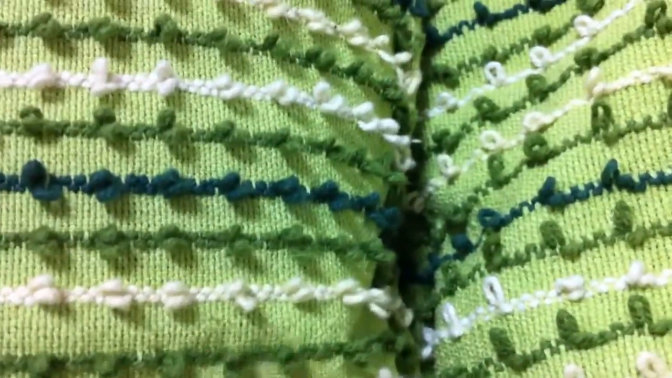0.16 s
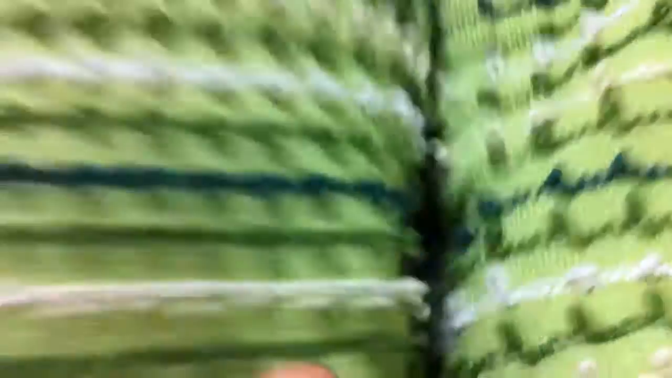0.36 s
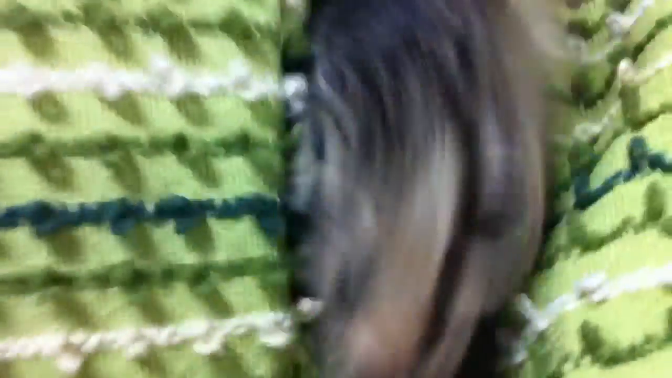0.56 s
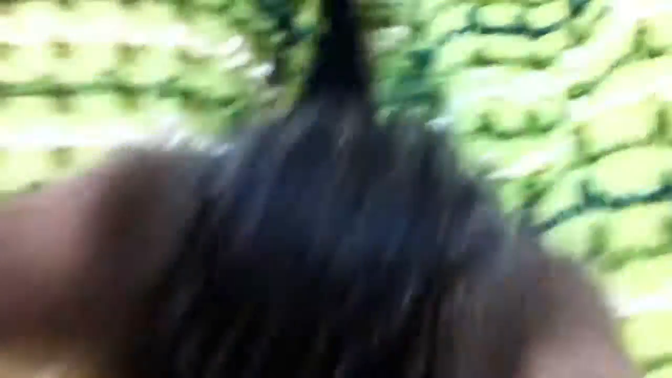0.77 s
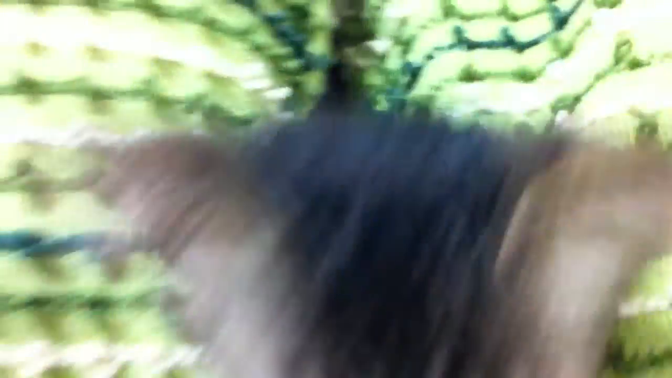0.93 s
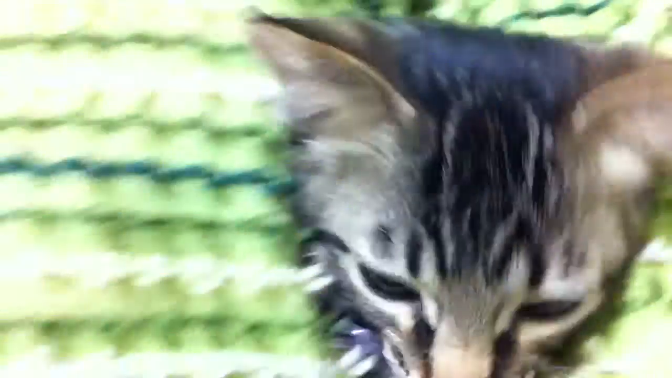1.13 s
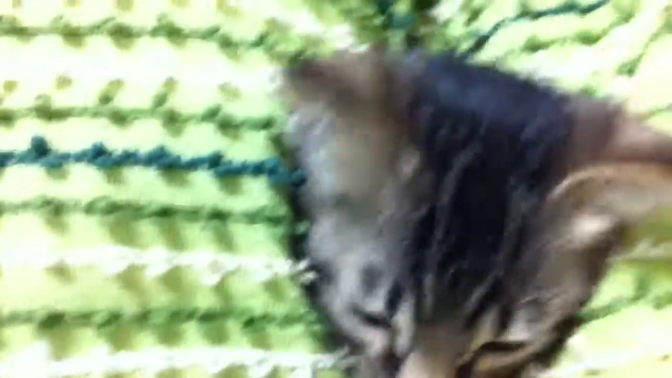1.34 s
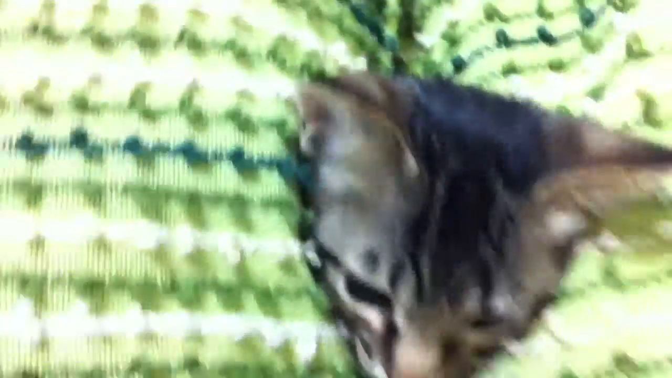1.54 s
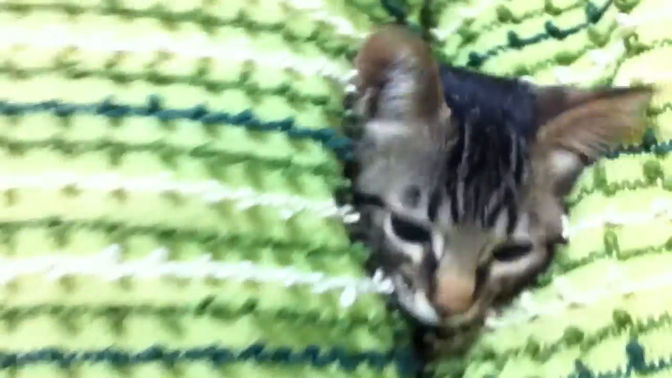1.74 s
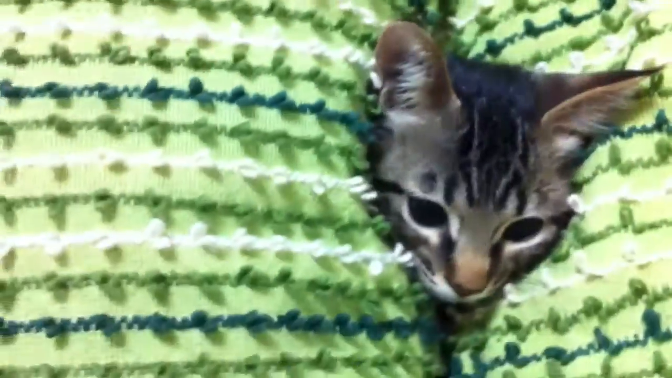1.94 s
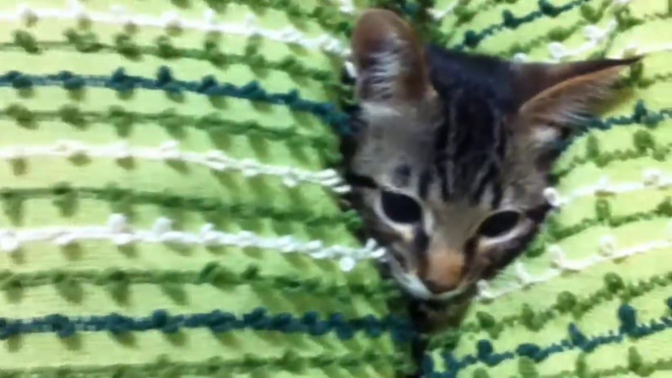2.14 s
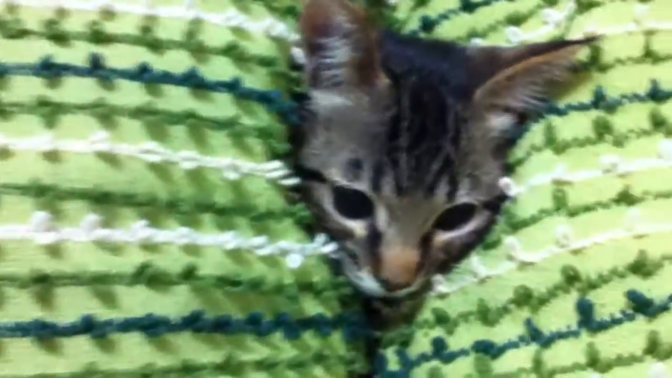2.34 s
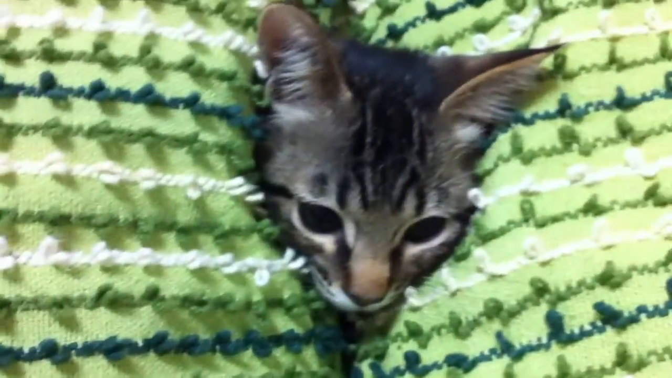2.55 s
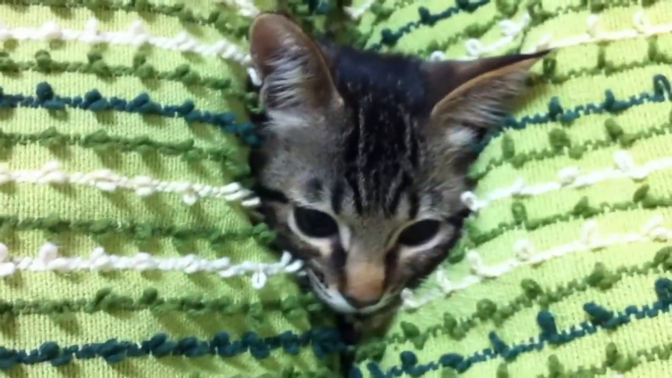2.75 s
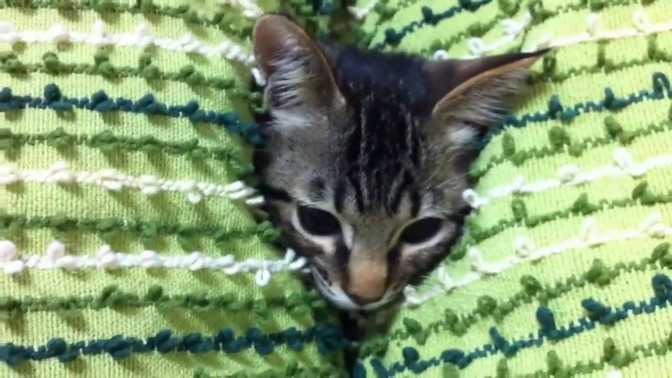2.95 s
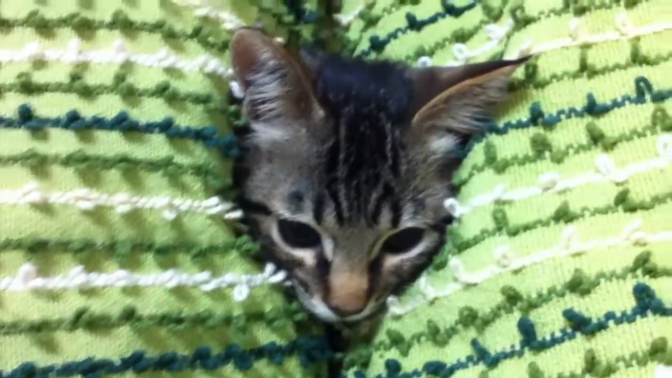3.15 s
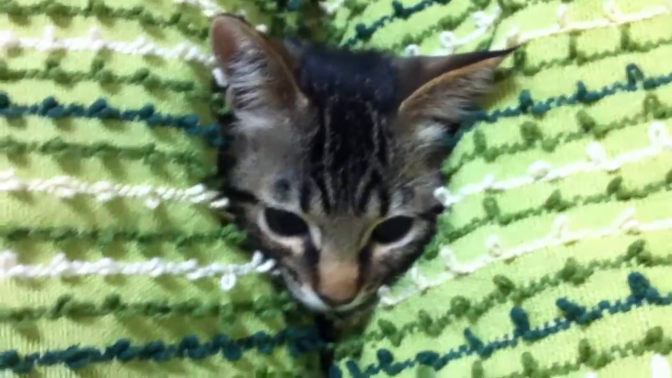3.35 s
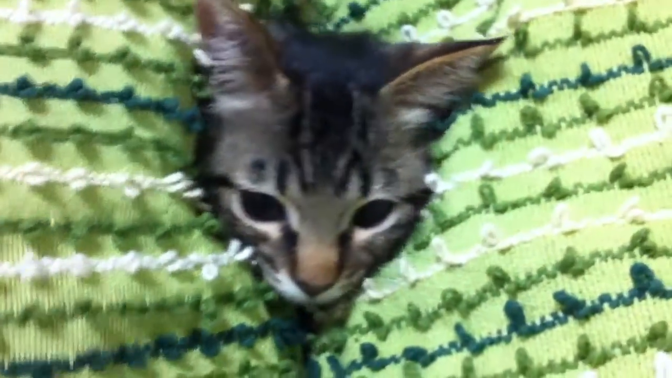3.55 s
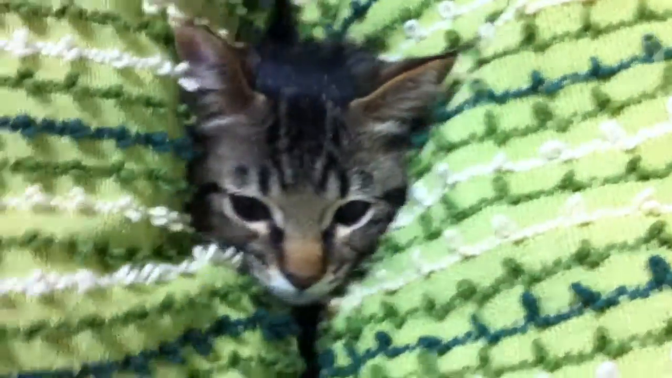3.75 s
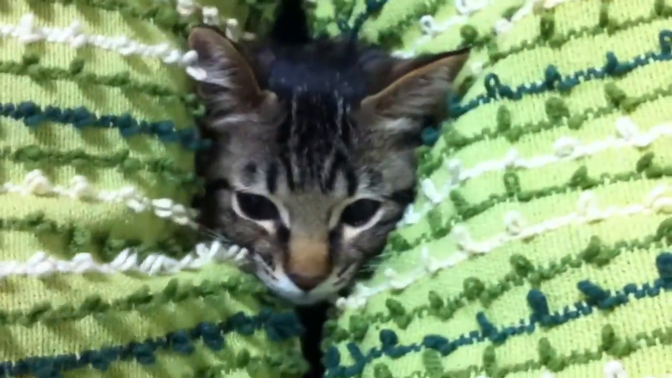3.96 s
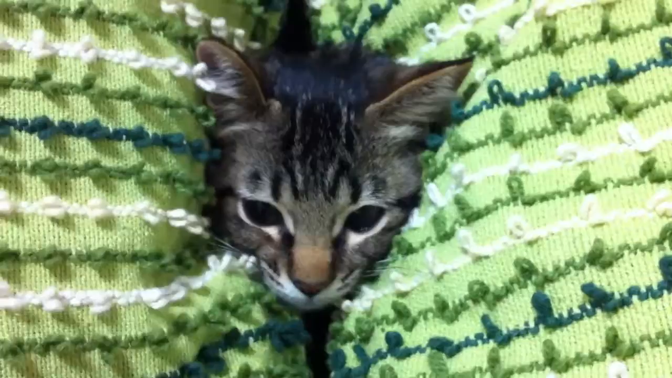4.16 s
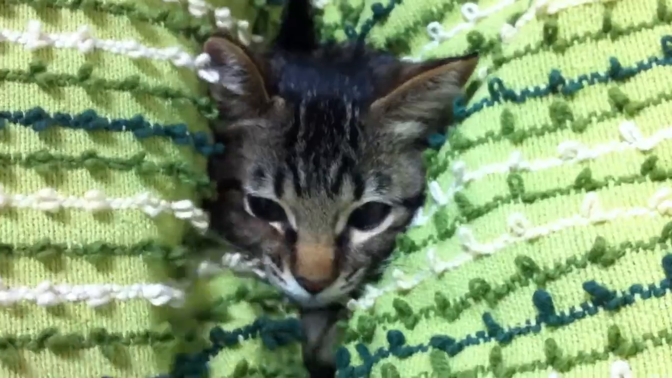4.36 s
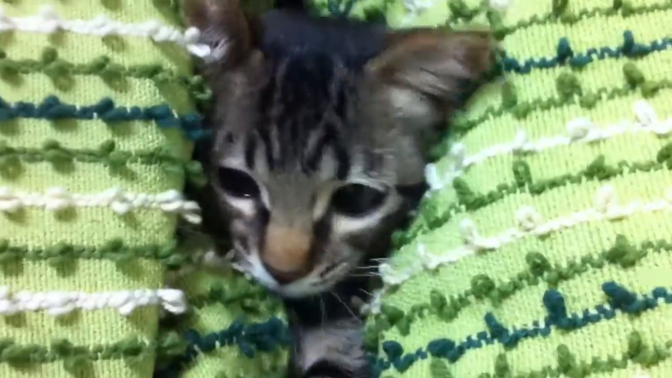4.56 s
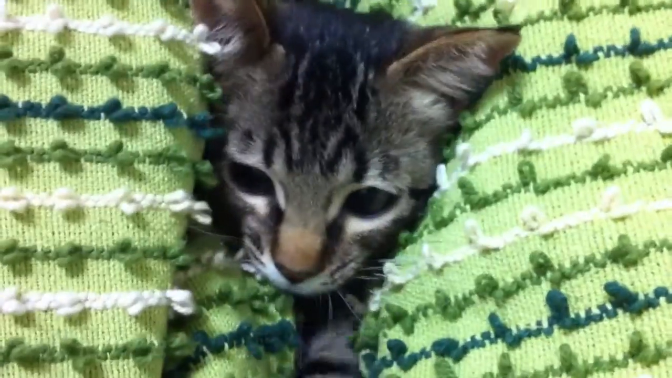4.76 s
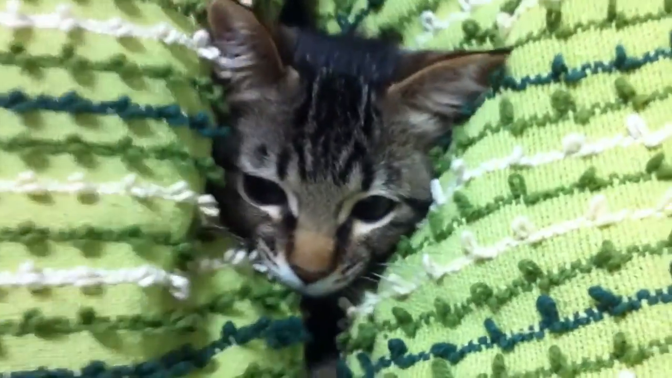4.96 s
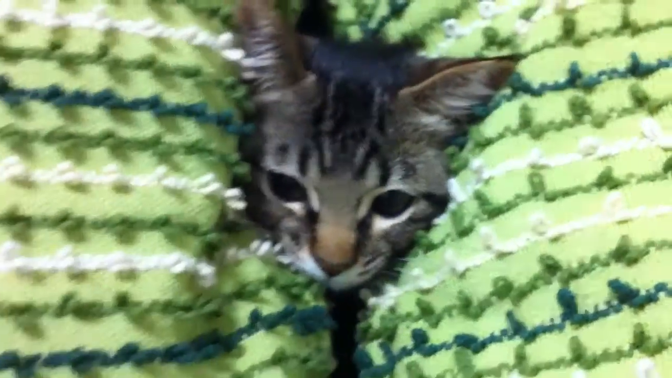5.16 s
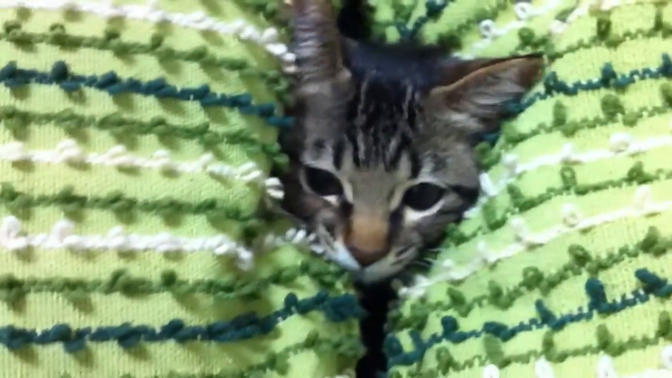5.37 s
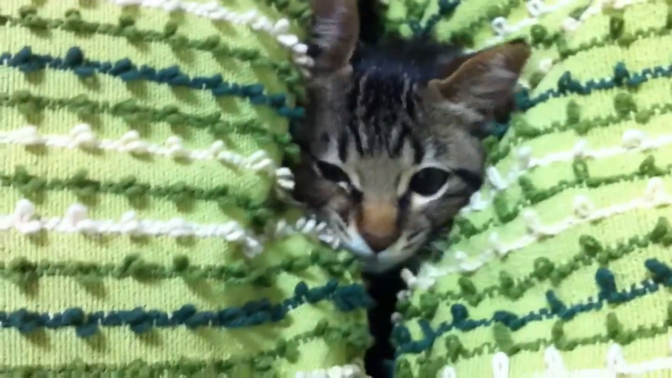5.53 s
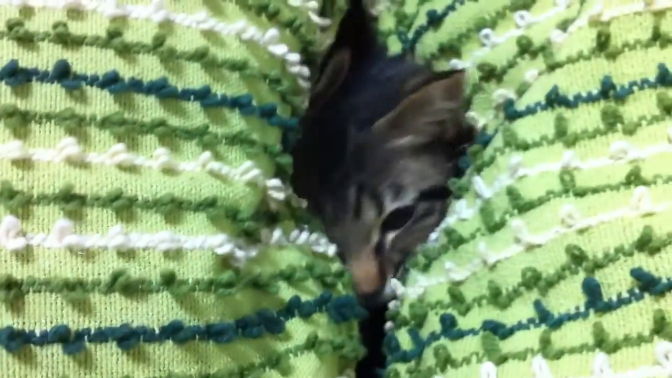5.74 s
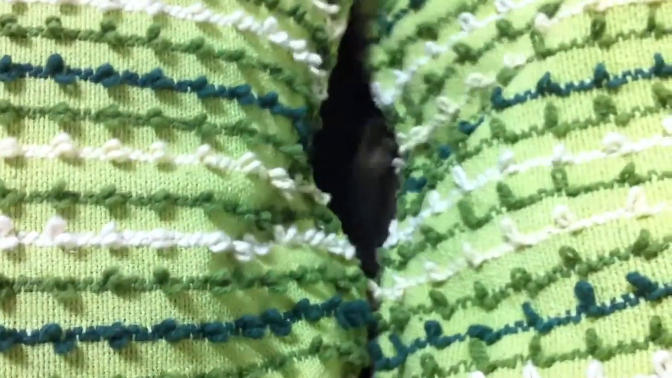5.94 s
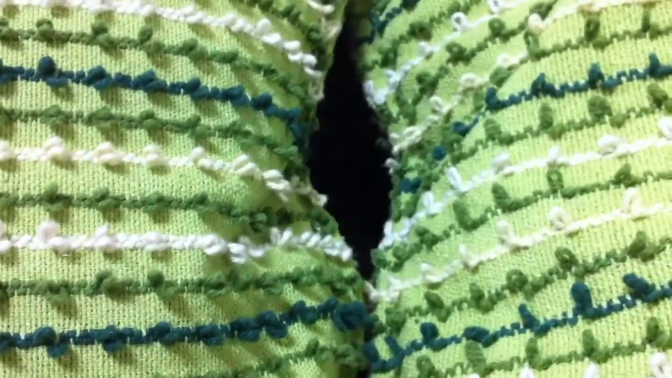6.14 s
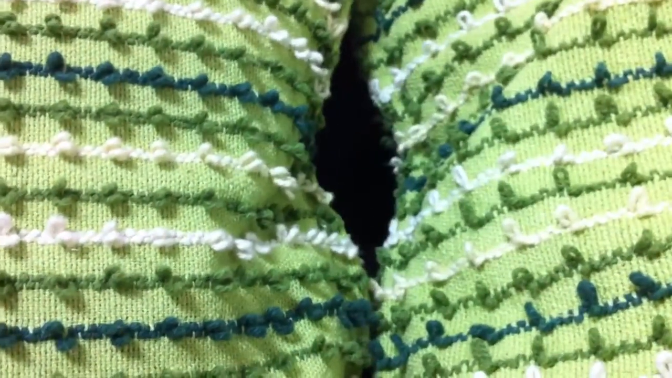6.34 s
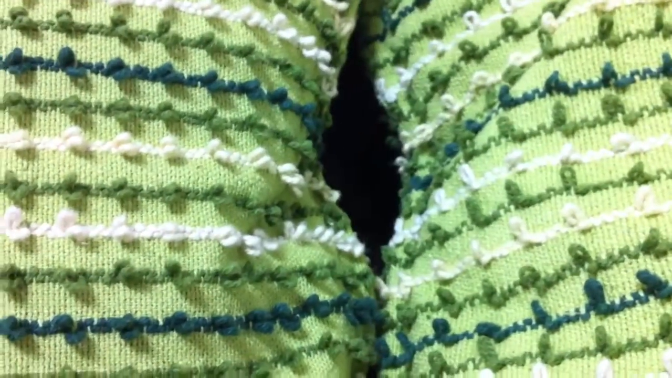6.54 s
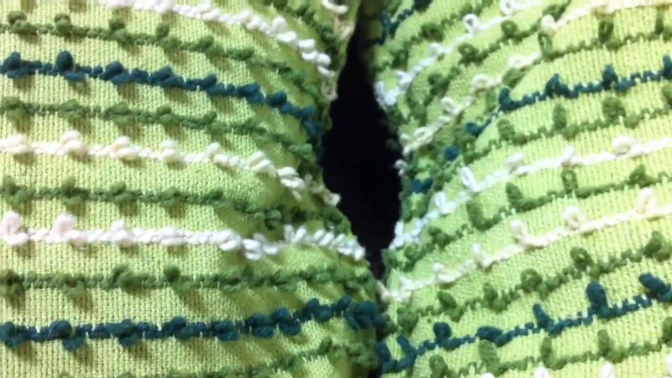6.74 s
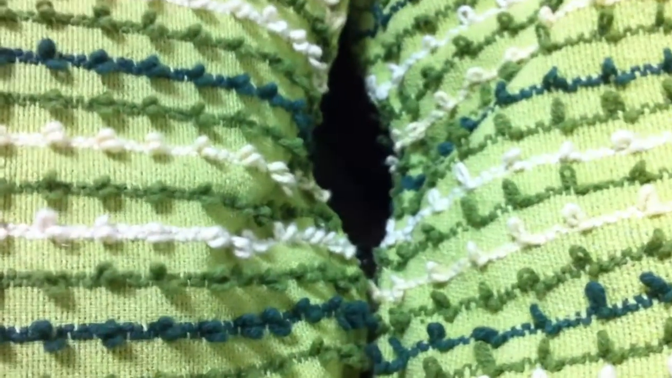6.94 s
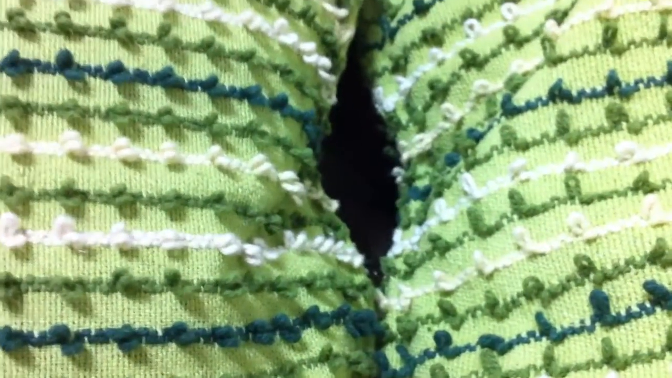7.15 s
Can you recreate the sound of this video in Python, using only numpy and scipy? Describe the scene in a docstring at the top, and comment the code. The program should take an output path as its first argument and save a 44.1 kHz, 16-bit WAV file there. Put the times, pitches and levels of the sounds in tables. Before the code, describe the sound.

Soft knit rustling and smothered little bell jingles in a quiet room, then faint tinkles, small bumps, and one loud handling clunk near the end.

```python
"""A small bell, likely on a kitten's collar, jingles close by, half smothered by fur and wool: a pellet
strikes and rolls in a shell of damped modes. The kitten pokes out of a knitted blanket and ducks back in.
The knit rustles, as swells of rub and fine hiss made from slipping fibres. Contact pulses and friction noise
make the bumps, dry ticks and one late scrape of cloth on the hand-held camera and its microphone.
The place is a quiet room: low hum under shaped noise for air and microphone hiss, and no echo."""
import sys
import numpy as np
from scipy import signal
from scipy.fft import rfft, irfft, next_fast_len
from scipy.io import wavfile
from scipy.ndimage import map_coordinates

SR = 44100
rng = np.random.default_rng(int(sys.argv[2]) if len(sys.argv) > 2 else 0)


def store_wav(level_fs):
    """Save 16-bit WAV to argv[1]."""
    pcm = np.round(np.clip(np.atleast_2d(level_fs), -1, 1) * 32767)
    wavfile.write(sys.argv[1], SR, pcm.T.astype(np.int16))


N = 317556  # length in samples

# Room air and microphone hiss, spectrum: (frequency [Hz], relative density [dB per Hz])
ROOM_SPECTRUM = [(15, -30), (25, -32), (48, -34.5), (91, -14), (104, -14), (123, -2), (157, -7.5),
                 (205, -6), (307, -4), (382, -11), (425, -10.5), (461, -13.5), (857, -14.5), (1550, -21.5),
                 (15800, -27.5)]
# Hum of a distant appliance: (frequency [Hz], mean level [dB])
HUM_TONES = [(120, -79), (298, -81)]
# Fur and wool sliding over each other: (peak time [s], half length [s], rub level [dB], fine hiss level [dB])
BLANKET_STROKES = [(0.132, 0.19, -68, -69.5), (0.542, 0.066, -59, -63.5), (0.737, 0.081, -57.5, -59),
                   (1.156, .06, -68.5, -60), (1.45, 0.047, -78, -61), (1.743, 0.21, -65, -65),
                   (3.804, 0.104, -64, -66.5), (4.244, 0.096, -67.5, -70.5), (4.553, .073, -65.5, -70),
                   (5.039, 0.026, -63.5, -58.5), (5.965, 0.057, -67, -73)]
# Dull rub of the knit, spectrum: (frequency [Hz], relative density [dB per Hz])
KNIT_SPECTRUM = [(60, -32), (130, 0.5), (280, -3), (600, -7.5), (1200, -10.5), (2400, -13), (4000, -15.5),
                 (8000, -23.5), (15000, -84)]
# Hiss of fine fibres, spectrum: (frequency [Hz], relative density [dB per Hz])
FIBRE_SPECTRUM = [(800, 3), (2500, -2.5), (5000, 0), (9000, 0), (10500, -7.5), (13000, -1), (16000, -6)]
# Bumps on the camera body: (time [s], peak level [dB], contact sharpness [Hz])
CAMERA_BUMPS = [(0.437, -40, 232), (0.5247, -42, 1800), (0.552, -36, 1310), (0.5861, -42.5, 290),
                (0.6957, -42.5, 1500), (0.7317, -36, 1800), (3.644, -49, 447), (3.7423, -41, 308),
                (3.7846, -47, 300), (3.8268, -37, 317), (4.1794, -44.5, 220), (4.204, -34, 336),
                (4.224, -34, 200), (4.2449, -40, 520), (4.2473, -34, 745), (4.5832, -35.5, 960),
                (5.0387, -37, 1070), (5.051, -40.5, 970), (5.6925, -21, 2630), (5.696, -14.5, 1540),
                (5.6984, -21.5, 750), (5.6986, -21.5, 235), (5.721, -23, 755), (5.7274, -29, 520),
                (5.7744, -29.5, 214), (5.788, -41, 210), (5.943, -48, 1490), (6.738, -46.5, 1550)]
# Flurries of blanket nudges: (peak time [s], half length [s], level [dB], contact sharpness [Hz])
BLANKET_NUDGES = [(.552, 0.03, -53.5, 1000), (0.744, 0.04, -53, 900), (3.816, 0.02, -54, 550),
                  (4.224, .018, -51, 547)]
# Damped modes of the camera body: (frequency [Hz], relative level [dB], T60 [s])
CASE_MODES = [(179.5, 5.5, 0.0295), (260.8, 2.5, 0.026), (450, -7, 0.013), (753, -9, 0.017),
              (1300, -3.5, 0.0055), (2100, -28, 0.0019)]
# Collar sways that set the pellet rolling: (peak time [s], half length [s], drive level [dB])
COLLAR_SWAYS = [(0.444, 0.022, -73), (0.616, 0.014, -46), (0.676, .016, -64), (0.771, .009, -54),
                (0.878, 0.0095, -42.5), (0.903, .022, -59), (0.968, 0.026, -51), (1.033, 0.029, -57),
                (1.106, 0.015, -57), (1.207, 0.0154, -55.5), (1.895, 0.035, -67), (2.188, .028, -68),
                (2.338, 0.017, -70), (3.975, .018, -62), (4.067, 0.025, -57.5), (4.234, 0.0089, -70.5),
                (4.423, .025, -75), (4.554, 0.013, -62), (4.66, 0.035, -64.5), (4.77, 0.072, -80),
                (5.137, 0.075, -77), (6.104, .02, -68.5)]
# Lower cluster of shell modes: (nominal frequency [Hz], mean relative level [dB], share of ring time [1])
LOW_SHELL_MODES = [(4600, 2.5, 1), (4680, -2.5, 1), (4600, -20, 0.7), (5740, -9, 0.7), (5800, -17, 0.52)]
# Upper cluster of shell modes: (nominal frequency [Hz], mean relative level [dB], share of ring time [1])
HIGH_SHELL_MODES = [(11300, -4.5, 1), (11620, -0.5, 1)]
# Click of pellet on shell, spectrum: (frequency [Hz], relative density [dB per Hz])
CLICK_SPECTRUM = [(1000, -78), (2400, -40.5), (3300, -27.5), (4000, -19.5), (4700, 8), (5100, 6.5),
                  (5600, 4), (6600, -12), (9000, -15.5), (10300, -53), (11500, -24), (15000, -36)]
# How far the wool lets the bell sound: (time [s], ring T60 [s], relative level of the upper part [dB])
BELL_FREEDOM = [(.6, 0.0282, -25), (.76, 0.039, -12.5), (.86, 0.025, -5), (.955, 0.072, -11),
                (1.04, .032, -5), (1.14, 0.028, -8), (1.25, 0.027, -16), (4.0, 0.03, -23.5),
                (4.62, 0.011, -18)]
# Hard pellet strikes on the shell: (time [s], strike strength [dB])
PELLET_STRIKES = [(0.6007, -42), (0.6057, -37.5), (.7072, -42), (0.7433, -34.5), (0.7599, -41), (.771, -41),
                  (0.8384, -27.5), (0.8804, -33.5), (.937, -37.5), (0.95, -36.5), (.9576, -37),
                  (.9736, -45), (.987, -44), (1.1415, -38.5), (1.1724, -52), (1.217, -46), (1.2444, -50.5),
                  (1.2875, -45.5), (1.8811, -47.5), (1.9382, -47.5), (2.1604, -52.5), (2.3165, -48.5),
                  (3.9573, -41.5), (3.984, -51), (4.045, -54), (4.058, -50.5), (4.1334, -56), (4.297, -55),
                  (4.5885, -45.5), (4.6242, -42.5), (4.646, -39.5)]
# Jolt of the whole bell: (nominal frequency [Hz], mean relative level [dB], share of ring time [1])
JOLT_MODES = [(4300, -6, 1), (4200, 8, 1)]
# Tiny dry ticks: (time [s], peak level [dB], centre frequency [Hz])
DRY_TICKS = [(3.456, -42, 5900), (3.8308, -47, 3400), (5.0505, -41, 11500), (5.693, -30.5, 2380),
             (5.6967, -19.5, 2100), (5.699, -43, 13100), (5.729, -45.5, 7500), (6.711, -45, 10000),
             (6.768, -49, 7950), (6.8023, -42, 6740), (6.908, -53.5, 3480), (7.13, -53, 2480)]
# Cloth dragging over the camera: (peak time [s], half length [s], level before the bass cut [dB])
CLOTH_DRAGS = [(5.699, 0.0059, -33), (5.723, .0065, -45.5), (5.759, 0.0135, -50.5), (5.7785, 0.0081, -31.5)]
# Cloth on the camera, spectrum: (frequency [Hz], relative density [dB per Hz])
SCRAPE_SPECTRUM = [(50, -27), (100, -3), (190, 8.5), (350, -13), (600, -15), (1000, -10), (1700, -14.5),
                   (2400, -7), (3100, -22.5), (5000, -20.5), (6500, -28.5), (9000, -33.5), (15500, -42)]

ROOM_DB = -65
REBOUND_S, REBOUND_LOSS_DB = 0.0099, 14.5  # mean spacing of bounces, and mean loss at each
TAP_DB, TAP_GROWS = -35.5, 0.37  # mean tap strength at a 0 dB sway, and dB gained per dB of sway
TOP_HZ = 15850  # the camera's band limit


def amp(db):
    """Decibels to gain."""
    return 10 ** (np.asarray(db) / 20)


def unit(x):
    """Scale to rms 1."""
    return x / np.sqrt(np.mean(x ** 2) + 1e-20)


def seconds(size):
    """A time axis [s]."""
    return np.arange(size) / SR


def fade(t, t60):
    """Exponential decay, down 60 dB after t60 seconds."""
    return np.exp(-np.log(1000) * t / t60)


def filtered(x, response):
    """Apply a complex response, given as a function of frequency."""
    size = next_fast_len(len(x) + SR // 4)
    hz = np.fft.rfftfreq(size, 1 / SR)
    return irfft(rfft(x, size) * response(hz), size)[:len(x)]


def spectrum_gain(points, hz):
    """Gain read from (frequency [Hz], level [dB]) points on a log frequency axis."""
    f, db = np.transpose(points)
    return amp(np.interp(np.log(hz + 1), np.log(f), db))


def coloured(x, points):
    """Shape a sound by a spectrum, at rms 1."""
    return unit(filtered(x, lambda hz: spectrum_gain(points, hz)))


def causal(points, size=2048):
    """Minimum-phase pulse with this spectrum, at peak 1: its energy comes as early as possible."""
    hz = np.fft.rfftfreq(size, 1 / SR)
    cepstrum = irfft(np.log(spectrum_gain(points, hz)))
    # folding the cepstrum forward in time makes the phase minimal
    cepstrum[1:size // 2] *= 2
    cepstrum[size // 2 + 1:] = 0
    pulse = irfft(np.exp(rfft(cepstrum)))
    return pulse / np.abs(pulse).max()


def highpass(x, edge_hz, order=4):
    """A causal bass cut."""
    return signal.sosfilt(signal.butter(order, edge_hz, "high", fs=SR, output="sos"), x)


def lowpass(x, edge_hz, order=4):
    """A causal treble cut."""
    return signal.sosfilt(signal.butter(order, edge_hz, fs=SR, output="sos"), x)


def wobble(rate):
    """A smooth random curve with this many knots a second."""
    knots = rng.standard_normal(int(N * rate / SR) + 4)
    return map_coordinates(knots, [seconds(N) * rate])


def add(track, s, sound):
    """Mix a sound in at time s."""
    start = max(round(s * SR), 0)
    track[start:start + len(sound)] += sound[:max(N - start, 0)]


def swell(s, half):
    """A movement that speeds up to its peak at time s and slows down again."""
    return np.exp(-np.minimum(((seconds(N) - s) / half) ** 2, 50))


def swells(rows):
    """The joint strength of several movements: (peak time [s], half length [s], level [dB])."""
    return sum(amp(db) * swell(s, half) for s, half, db in rows)


def slips(rate, spread_db, smooth):
    """Catching and letting go: rate uneven impulses a second over a smooth friction noise."""
    fires = rng.random(N) < rate / SR
    sizes = rng.standard_normal(N) * amp(spread_db * rng.standard_normal(N))
    return unit(fires * sizes) + smooth * rng.standard_normal(N)


def room(waver_db=2, drift_rad=0.8):
    """Still air and microphone hiss as shaped noise, with a hum wavering in level and phase."""
    hum = np.zeros(N)
    for hz, db in HUM_TONES:
        level = amp(db + waver_db * wobble(2.3))
        phase = 2 * np.pi * hz * seconds(N) + drift_rad * wobble(6)
        hum += level * unit(np.sin(phase))
    air = coloured(rng.standard_normal(N), ROOM_SPECTRUM)
    return hum + amp(ROOM_DB) * air


def blanket(uneven_db=1.0):
    """Sliding wool catches and slips: each stroke swells with a dull rub and a hiss of fine fibres."""
    rub, hiss = np.zeros(N), np.zeros(N)
    for s, half, rub_db, hiss_db in BLANKET_STROKES:
        speed = swell(s, half)
        rub += amp(rub_db) * speed
        hiss += amp(hiss_db) * speed
    knit = coloured(slips(rate=900, spread_db=2.5, smooth=.6), KNIT_SPECTRUM)
    fibres = coloured(slips(rate=4000, spread_db=2, smooth=1), FIBRE_SPECTRUM)
    return (rub * knit + hiss * fibres) * amp(uneven_db * wobble(60))


def thud(sharp_hz, cut_hz=104, give=0.96, grit_db=-24, grit_t60=0.051):
    """A push rings the case briefly; the springy contact passes little above its own pitch."""
    t = seconds(SR // 12)
    body = sum(amp(db) * np.cos(2 * np.pi * hz * t) * fade(t, t60) for hz, db, t60 in CASE_MODES)
    grit = amp(grit_db) * rng.standard_normal(len(t)) * fade(t, grit_t60)
    # mass on a damped spring; give sets the damping
    spring = lambda hz: 1 / (1 - (hz / sharp_hz) ** 2 + 1j * give * hz / sharp_hz)
    push = filtered(body + grit, spring)
    push = highpass(push, cut_hz, order=3)  # the microphone drops the deep bass
    return push / np.abs(push).max()


def bumps():
    """Single blows ring the camera body; pressing wool gives flurries of nudges at chance moments."""
    out = np.zeros(N)
    nudges = slips(rate=350, spread_db=1, smooth=.35)
    for s, half, db, sharp_hz in BLANKET_NUDGES:
        flurry = unit(signal.oaconvolve(nudges, thud(sharp_hz))[:N])
        out += amp(db) * swell(s, half) * flurry
    for s, db, sharp_hz in CAMERA_BUMPS:
        add(out, s, amp(db) * thud(sharp_hz))
    return out


def ring(modes, t, t60):
    """Shell modes; where the pellet lands and rests sets their strengths and nudges their pitch."""
    detune, spread_db = .004, 1.2  # random deviations: share of the pitch, and level
    out = np.zeros(len(t))
    for hz, db, share in modes:
        strength = amp(db + rng.normal(0, spread_db))
        pitch = hz * (1 + detune * rng.normal())
        out += strength * np.sin(2 * np.pi * pitch * t) * fade(t, t60 * share)
    return out


def rung(push, answer):
    """Drive a resonance, scaled to unit energy, with a continuous push."""
    return signal.oaconvolve(push, answer / np.linalg.norm(answer))[:N]


def rolling(upper_db=-9):
    """Rolling within the swaying bell, the pellet chatters finely and keeps the shell singing."""
    ring_share, t60 = .18, .035  # ring against click, and ring time [s]
    click = causal(CLICK_SPECTRUM)
    t = seconds(len(click))
    chatter = swells(COLLAR_SWAYS) * unit(slips(rate=1200, spread_db=1.5, smooth=.2))
    times, _, upper_dbs = np.transpose(BELL_FREEDOM)
    upper = amp(upper_db + np.interp(seconds(N), times, upper_dbs))
    low = rung(chatter, click + ring_share * ring(LOW_SHELL_MODES, t, t60))
    high = rung(upper * chatter, ring(HIGH_SHELL_MODES, t, t60))
    return low + high


def contacts(scatter_db=2, count=3):
    """Pellet touches (time [s], strength [dB]): strikes with two rebounds, and three chance taps a sway."""
    touches = []
    for s, db in PELLET_STRIKES:
        touches.append((s, db))
        for k in range(1, count):
            flight = REBOUND_S * (k + rng.uniform(-0.34, 0.25))
            touches.append((s + flight, db - k * REBOUND_LOSS_DB + scatter_db * rng.normal()))
    for s, half, db in COLLAR_SWAYS:
        for _ in range(count):
            moment = s + half * rng.uniform(-1, 1)
            touches.append((moment, TAP_DB + TAP_GROWS * db + scatter_db * rng.normal()))
    return touches


def bell(ring_db=-2, click_db=3, wool_hz=7000, glint_db=10):
    """Each touch of the pellet clicks and rings the shell, as far as the wool lets it."""
    clink, shimmer = np.zeros(N), np.zeros(N)
    t = seconds(SR // 12)
    click = causal(CLICK_SPECTRUM)
    # the click's top, which fur swallows along with the upper modes
    glint = amp(glint_db) * highpass(click, edge_hz=8300, order=2)
    times, ring_times, upper_dbs = np.transpose(BELL_FREEDOM)
    for s, db in contacts():
        t60 = np.interp(s, times, ring_times)
        upper_db = np.interp(s, times, upper_dbs)
        add(clink, s, amp(db + ring_db) * ring(LOW_SHELL_MODES, t, t60))
        add(clink, s, amp(db + click_db) * click)
        add(shimmer, s, amp(db + ring_db + upper_db) * ring(HIGH_SHELL_MODES, t, t60))
        add(shimmer, s, amp(db + click_db + upper_db) * glint)
    return lowpass(clink + jolts(), wool_hz, order=3) + shimmer


def jolts(firm_db=-40, jolt_db=-34, grows=1.7, t60=0.0076):
    """Strikes also jolt the whole bell, steeply more when harder; the wool stills it at once."""
    out, t = np.zeros(N), seconds(SR // 12)
    for s, db in PELLET_STRIKES:
        extra_db = jolt_db + grows * (db - firm_db)  # on top of the strike's own strength
        add(out, s, amp(db + extra_db) * ring(JOLT_MODES, t, t60))
    return out


def ticks(q=0.83):
    """Short snaps: bursts of fading noise, each through a broad resonance."""
    out, t = np.zeros(N), seconds(SR // 30)
    for s, db, centre_hz in DRY_TICKS:
        def resonance(hz):
            """Two equal bandpass stages in a row."""
            damping = 1j * hz * centre_hz
            return (damping / (q * (centre_hz ** 2 - hz ** 2) + damping)) ** 2
        burst = rng.standard_normal(len(t)) * fade(t, t60=.005)
        snap = filtered(burst, resonance)
        add(out, s, amp(db) * snap / np.abs(snap).max())
    return out


def scrape():
    """As the kitten ducks, the cloth drags over the camera and slips off: swells of dense friction."""
    friction = slips(rate=5000, spread_db=2, smooth=.5)
    return swells(CLOTH_DRAGS) * coloured(friction, SCRAPE_SPECTRUM)


def scene():
    """Everything is close to the one microphone, and the wool swallows all echo."""
    jingle = highpass(rolling() + bell(), edge_hz=3800)  # so small a shell cannot radiate lower
    handling = bumps() + highpass(scrape(), edge_hz=108)
    return (room() + blanket() + handling + jingle + ticks())[None]


def record(dry):
    """The camera keeps nothing above its band limit."""
    return np.array([filtered(channel, lambda hz: hz < TOP_HZ) for channel in dry])


dry = scene()
out = record(dry)
store_wav(out)
```